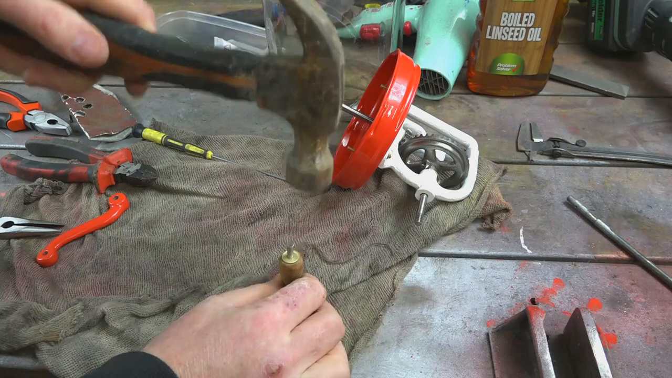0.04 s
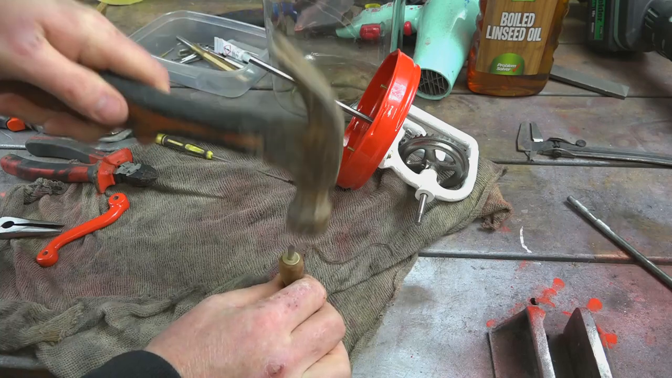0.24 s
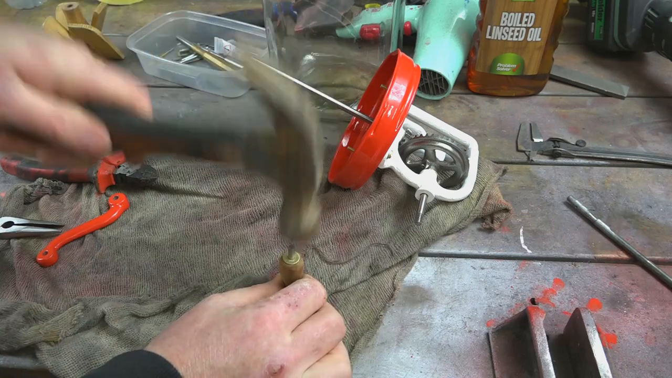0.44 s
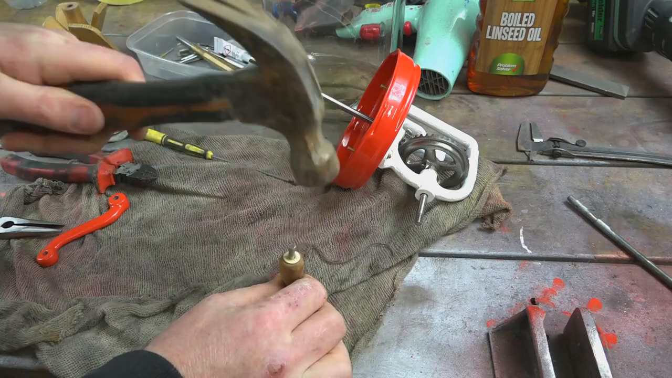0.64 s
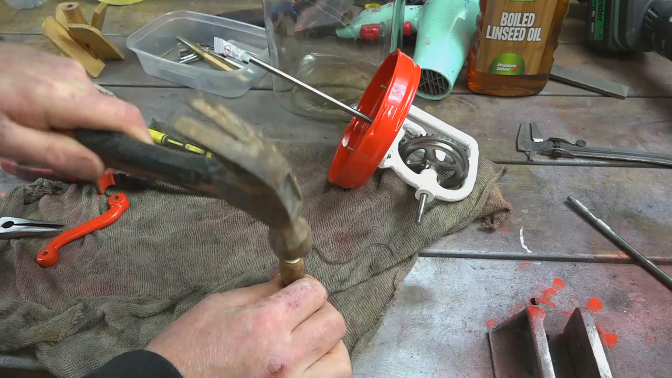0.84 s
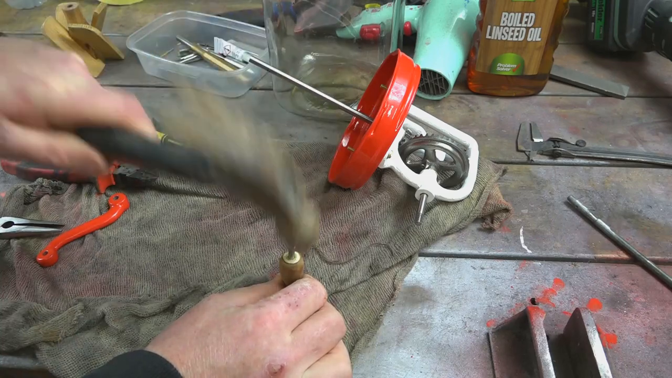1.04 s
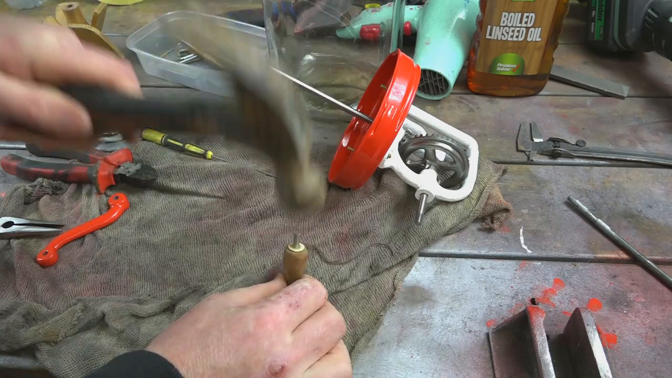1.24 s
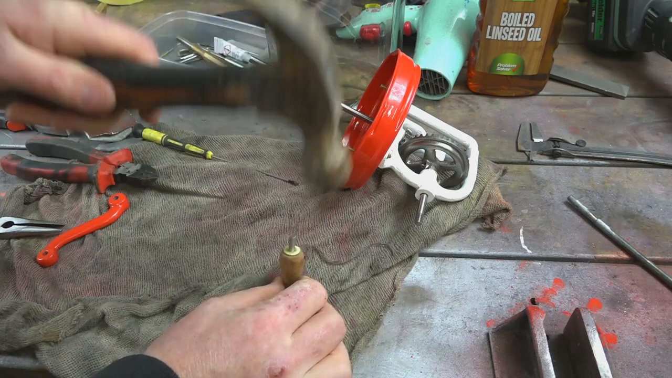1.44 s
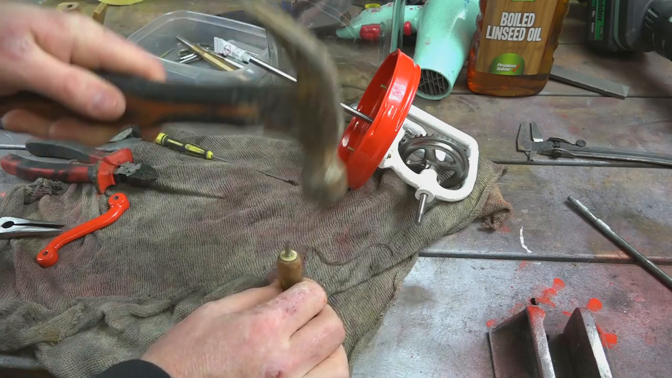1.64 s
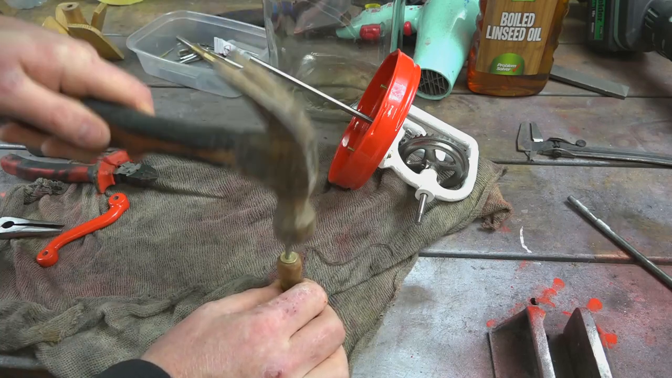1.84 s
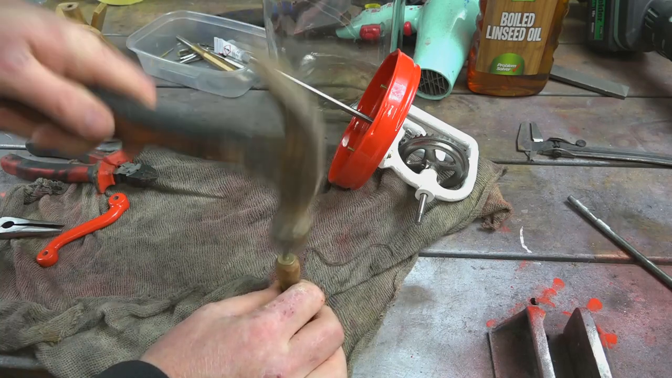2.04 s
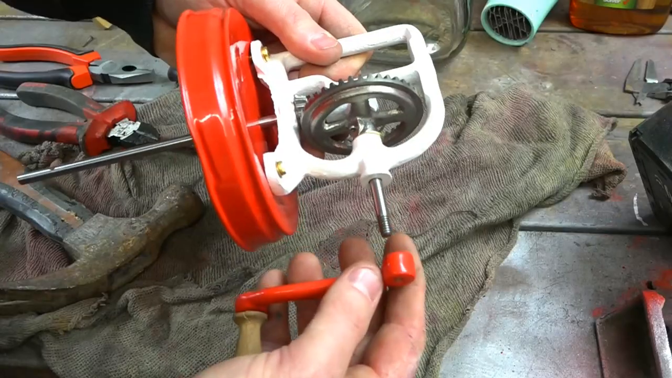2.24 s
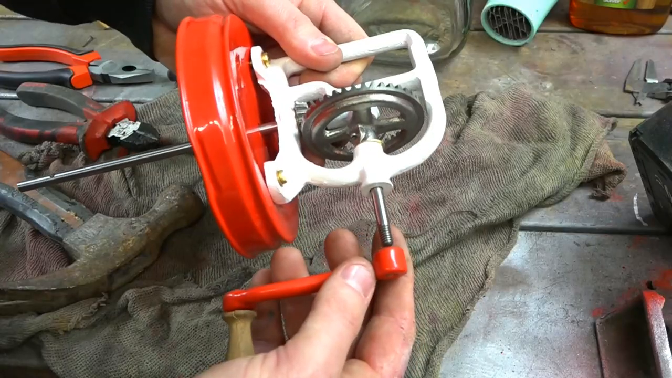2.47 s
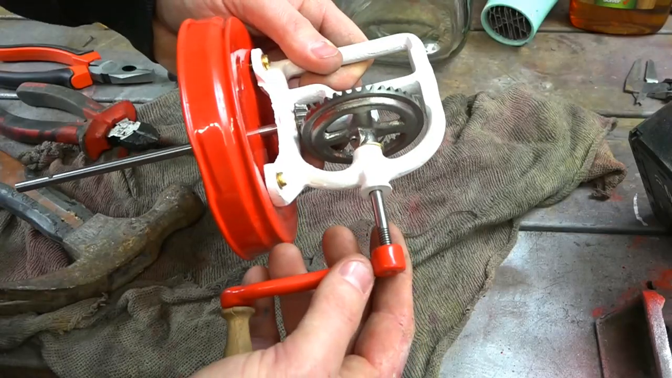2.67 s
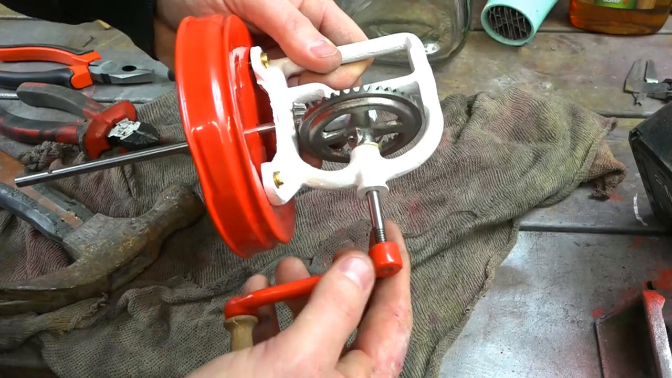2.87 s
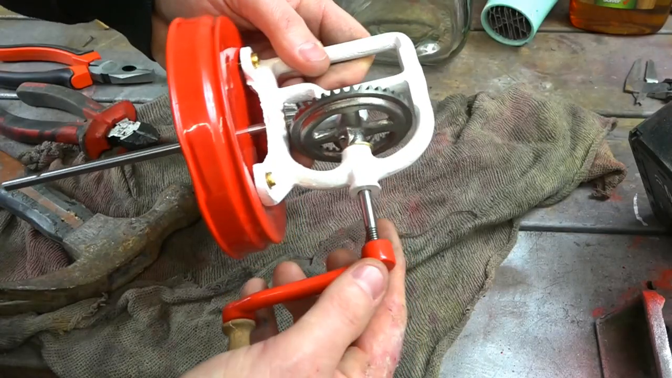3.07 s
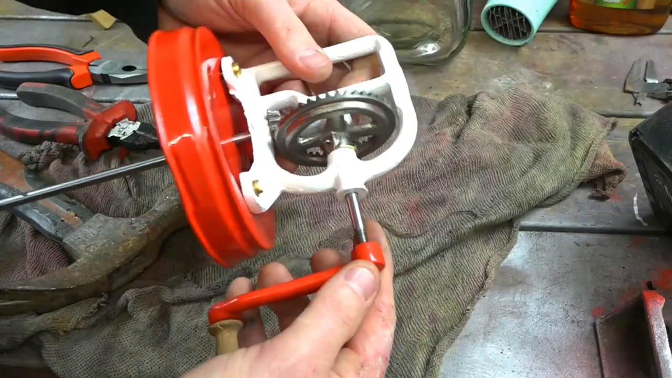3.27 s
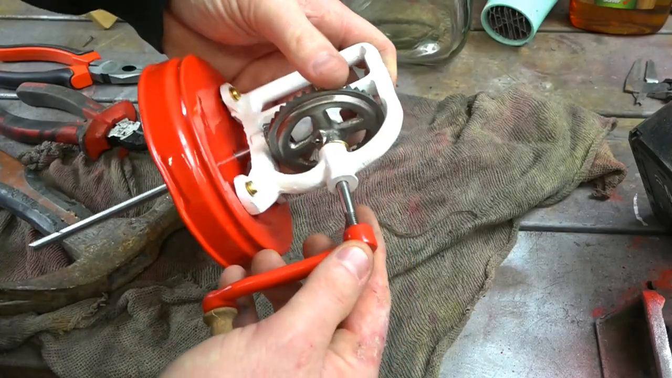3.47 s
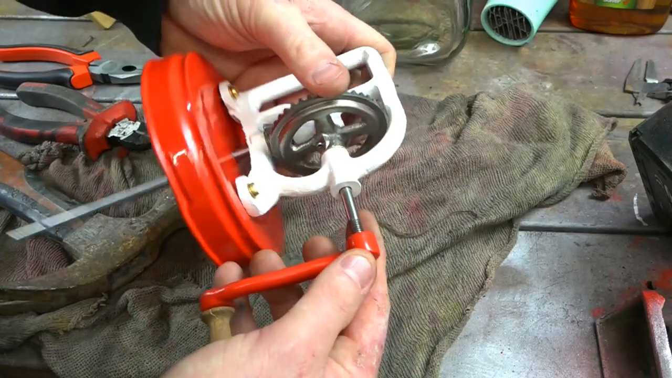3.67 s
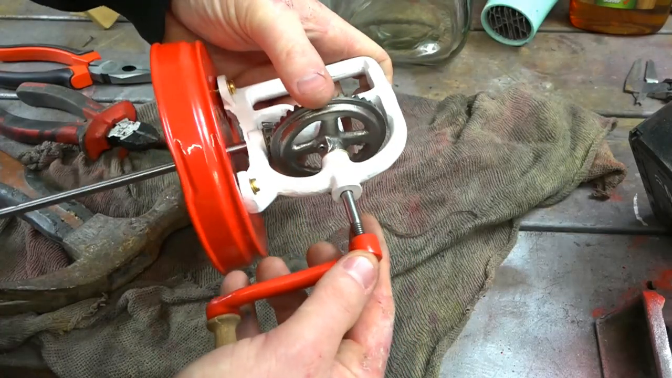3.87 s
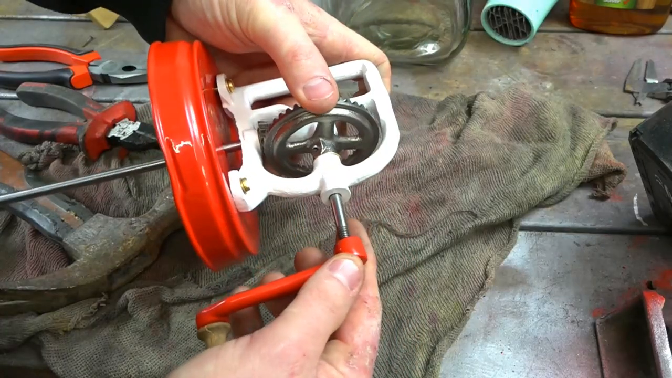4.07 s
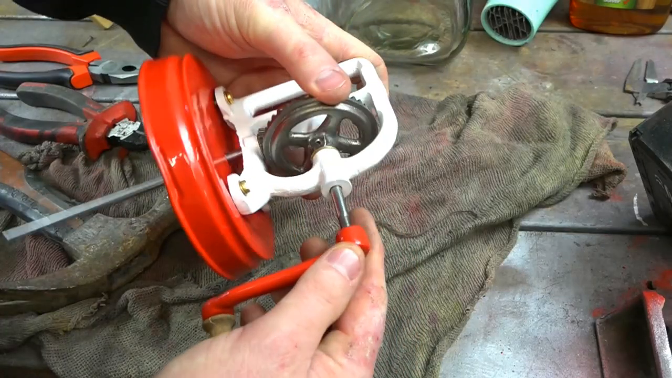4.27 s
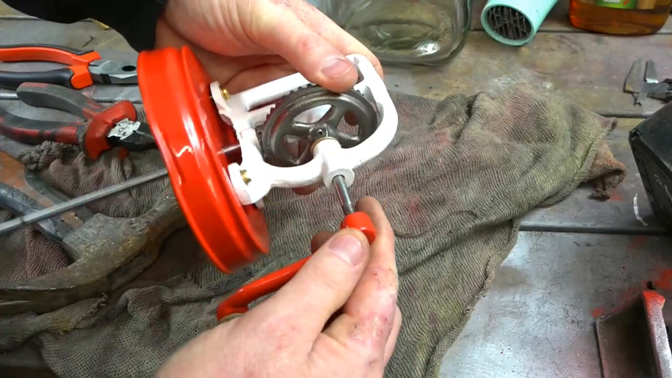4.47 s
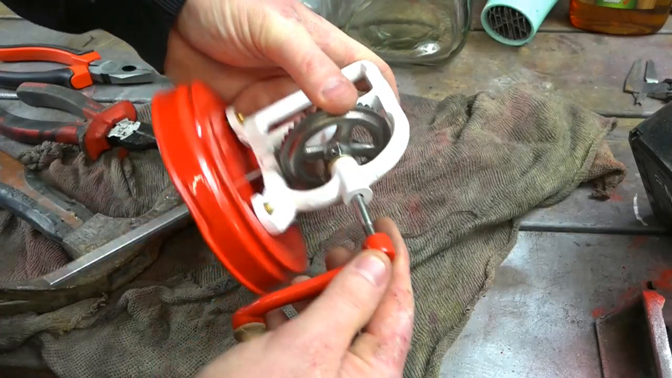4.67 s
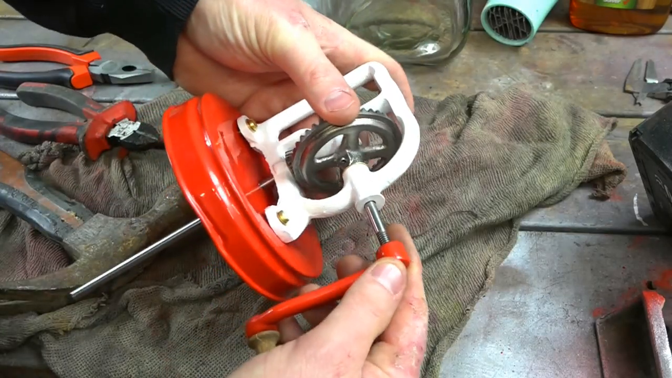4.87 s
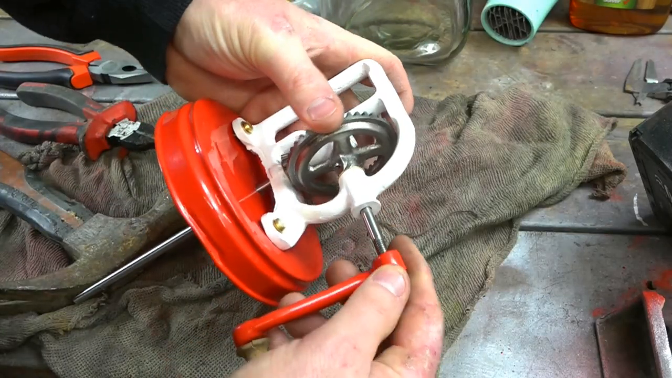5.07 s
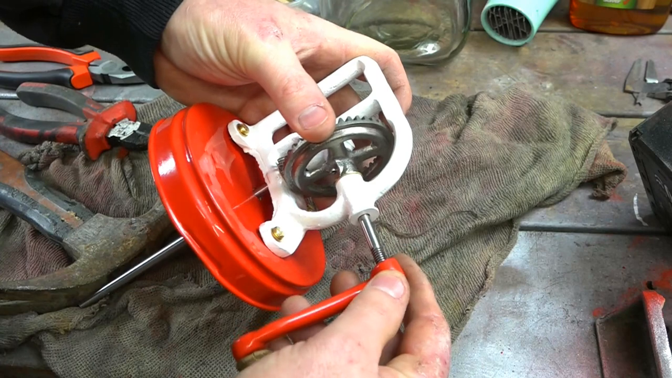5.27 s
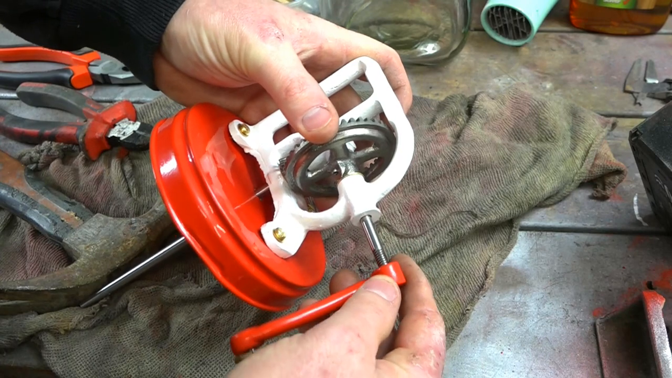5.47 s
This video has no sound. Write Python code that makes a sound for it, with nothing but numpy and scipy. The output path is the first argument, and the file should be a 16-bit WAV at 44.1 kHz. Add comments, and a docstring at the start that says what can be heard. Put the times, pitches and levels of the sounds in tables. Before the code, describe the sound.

Seven hard hammer blows ring and clatter on a workshop bench, then an abrupt cut to quiet metallic ticks and clacks of a crank being fitted.

```python
"""Hammering on a bench, then fitting a crank

A hammer drives a pin into a wooden handle on a cloth-covered steel bench: noise cracks, decaying modes of pin
and bench, clatter of resonant noise, echoes of dying noise. A steady hiss with a rumble stops early on.
After a cut, hands fit a crank to a geared frame with a tin lid: ringing modes and grit noise make the ticks
and clacks, grainy noise the scrapes, over quiet room tone."""
import sys
import numpy as np
from scipy import signal
from scipy.fft import rfft, irfft
from scipy.io import wavfile
from scipy.ndimage import uniform_filter1d, minimum_filter1d

SR = 44100
rng = np.random.default_rng(int(sys.argv[2]) if len(sys.argv) > 2 else 0)


def wav_out(sig):
    """Save sig, one row per channel (or a flat mono array), as 16-bit PCM at SR to the path in sys.argv[1]."""
    wavfile.write(sys.argv[1], SR, np.round(np.clip(np.atleast_2d(sig).T, -1, 1) * 32767).astype(np.int16))


N = 242991

# spectra below are relative: their overall level is normalised
# room tone spectrum: freq_hz, density_db_per_hz
TONE_SPECTRUM = [(15, -55), (25, 12), (87, 1), (114, -7), (145, -1.5), (249, -1.5), (489, -6.5),
                 (775, -7.5), (1260, -9.5), (2050, -13), (3160, -23.5), (7920, -23.5), (16000, -34.5)]
# hiss spectrum: freq_hz, density_db_per_hz
HISS_SPECTRUM = [(1470, -12), (2500, -9.5), (4370, -9), (4620, -10), (8020, -8.5), (14100, -7),
                 (16000, -7.5)]
# room tone, left-right correlation: freq_hz, correlation
TONE_CORRELATION = [(60, 0.85), (180, 0.9), (550, 0.85), (1650, 0.96), (4970, 0.74), (15000, -0.57)]
# echoes, left-right correlation: freq_hz, correlation
ECHO_CORRELATION = [(60, 0.92), (180, 1), (550, 0.94), (1650, 0.98), (4970, 0.87), (15000, 0.22)]
# workshop reverberation: freq_hz, t60_s
WORKSHOP_DECAY = [(80, 0.71), (210, 0.36), (560, 0.43), (1470, 0.51), (3880, 0.49), (10200, 0.35)]
# a bright scraping clatter of the hammer, then two dull knocks, ahead of blows: start_s, boom_db, clatter_db
HAMMER_SCRAPE_AND_KNOCKS = [(0.151, -43, -11.5), (0.472, -33, -28.5), (0.78, -35, -28)]
# hammer blows: start_s, boom_db, clatter_db, clatter_tilt_db_per_octave, crack_db, ping_db
HAMMER_BLOWS = [(0.222, -8, -11.5, 0, -45, -15), (0.535, -3.5, -10, 0.52, -20, -25),
                (0.843, -5, -7.5, -0.21, -41, -38), (1.136, -15, -11, -2, -32.5, -23.5),
                (1.603, -13, -14, 0.7, -32, -19), (1.864, -11, -14, 0.24, -26.5, -30),
                (2.131, -9, -15, 0.2, -26, -23)]
# bench modes: freq_hz, level_db, t60_s
BENCH_MODES = [(140, -21, .15), (170, -10, .15), (205, -11, .1), (248, -8, .1), (300, -8, .08),
               (340, -3, .1), (366, -1, .09), (395, -6, .07), (445, -11, .07), (640, -12, .07),
               (1260, -15, .08)]
# pin modes: freq_hz, level_db, t60_s
PIN_MODES = [(7730, 0, .025), (5890, -9, .012)]
# bench top and loose tools, spectrum: freq_hz, density_db_per_hz
CLATTER_SPECTRUM = [(35, -84), (60, -34), (151, -6.5), (234, 5), (364, -5.5), (491, -13), (648, -7),
                    (798, -12), (1150, -12.5), (1790, -17.5), (4730, -22), (6380, -30), (12200, -44.5),
                    (15000, -56)]
# touches of the bare shaft: start_s, crack_db
SHAFT_TOUCHES = [(2.2793, -47), (2.375, -48.5)]
# shaft modes: freq_hz, level_db, t60_s
SHAFT_MODES = [(3730, -4, .3), (3752, -4, .3), (5500, -2, .03), (9150, -5, .08)]
# contacts while fitting the crank: start_s, part_struck, level_db, rattle_s
CONTACTS = [(2.795, "crank", -57, 0.002), (3.13, "frame", -62, 0.016), (3.189, "frame", -55.5, .006),
            (3.481, "gear", -57, 0.0068), (3.4916, "crank", -49, 0.016), (3.586, "crank", -45, 0.016),
            (3.6026, "edge", -40, 0.0062), (3.6635, "lid", -29, 0.014), (3.7226, "lid", -32.5, 0.0032),
            (3.735, "edge", -51.5, 0.013), (3.7896, "crank", -52, .008), (4.2926, "frame", -32, 0.0073),
            (4.615, "gear", -51, .0044), (4.6383, "edge", -33, 0.0035), (4.771, "frame", -11.5, 0.014),
            (4.9676, "crank", -41, 0.0053), (5.123, "lid", -37, 0.025), (5.224, "crank", -48.5, 0.0065),
            (5.271, "hub", -20, 0.0061), (5.453, "edge", -54, 0.0065), (5.493, "frame", -51, 0.013)]
# shares of a contact by part_struck: crack_db, lid_db, crank_db, frame_db, gear_db, frame_tilt_db_per_octave
PART_SHARES = {"lid": (-14.5, 0.5, -8.5, -22, -38, 9), "crank": (4.5, -3, 0, -6, -30, -4),
               "frame": (4, -10.5, -9.5, -5, -11, 1.5), "gear": (-16, -6, -2, -10, 1.5, 2),
               "hub": (2, -7, -1.5, -6.5, -6.5, -11.5), "edge": (2.5, -20, -9.5, -20, -11.5, -2)}
# tin lid modes: freq_hz, level_db, t60_s
LID_MODES = [(582, -24.5, 0.083), (1282, -6.5, 0.11), (1468, -7, 0.049)]
# crank modes: freq_hz, level_db, t60_s
CRANK_MODES = [(1545, 0, .05), (1615, 0, .05), (1906, -8, .05), (2020, -11, .05)]
# frame modes: freq_hz, level_db, t60_s
FRAME_MODES = [(2143, -5, .04), (2422, -3, .04), (2760, -2, .05), (3050, -2, .04), (3410, -4, .035),
               (3980, -2, .04), (4220, 0, .05), (4370, -3, .04), (4600, -3, .04), (4850, -4, .03)]
# gear modes: freq_hz, level_db, t60_s
GEAR_MODES = [(5400, -3, .02), (6385, -3, .025), (7014, -4, .02), (7900, -4, .02), (8506, -4, .02),
              (9215, 1, .03), (10300, -6, .015)]
# dry crack of a contact, spectrum: freq_hz, density_db_per_hz
GRIT_SPECTRUM = [(88, -55.5), (150, -24.5), (894, -24), (1270, -16.5), (3350, -11.5), (4310, -10.5),
                 (5330, -17), (9180, -18), (15500, -51.5)]
# hands move to the right: time_s, left_minus_right_db
HAND_DRIFT = [(4.2, -0.9), (5.3, -1.5)]
# crank slides on its shaft: start_s, rise_s, hold_s, level_db
SLIDES = [(3.092, 0.014, 0.1, -61.5), (4.266, 0.021, .12, -51.5), (4.543, 0.0034, 0.091, -46),
          (4.72, 0.027, .01, -52.5)]
# sliding contact spectrum: freq_hz, density_db_per_hz
RUB_SPECTRUM = [(530, -29), (900, -78), (989, -51), (1100, -23), (1850, 7), (2280, -32), (3100, -6.5),
                (5450, -8), (15000, -28)]

FLAT, MONO = [(60, 0), (16000, 0)], [(1000, 1)]  # freq_hz, density_db_per_hz; freq_hz, correlation
CUT_S, CUT_FADE_S = 2.19, 0.0014  # hammering ends abruptly
TONE_HAMMERING_DB, TONE_FITTING_DB = -58, -54  # before and after the cut
HISS_DB, HISS_STOP_S, HISS_FALL_DB_PER_S = -47, 0.89, 161
RUMBLE_RE_HISS_DB = -7
HAMMERING_LOW_HZ, CRACK_TOP_HZ = 102, 9300  # hammering thins out below; crack dulls above
LEAD_RE_BOOM_DB, LEAD_S = -24, .009  # thud ahead of the boom
MODE_SCATTER_DB = 2  # standard deviation between contacts
SHAFT_RING_RE_CRACK_DB = -5.5
SLIDE_FALL_S, SLIDE_ENDS_RE_LEVEL_DB = 0.073, -21
MIC_LOW_HZ, TOP_HZ, LEFT_LAG_S, LIMIT_DB = 32.6, 16100, .000016, -6.0


def amp(db):
    """Amplitude factor of a level in dB."""
    return 10 ** (np.asarray(db) / 20)


def unit(x):
    """Signal scaled to rms 1."""
    return x / np.sqrt(np.mean(x ** 2) + 1e-20)


def along(points, hz):
    """Interpolates (freq_hz, value) points on a log frequency axis."""
    f, v = np.transpose(points)
    return np.interp(np.log(hz + 1), np.log(f + 1), v)


def level(rows):
    """Gain per sample from (time_s, level_db) rows, inaudible outside them."""
    s, db = np.transpose(rows)
    return amp(np.interp(np.arange(N) / SR, s, db, left=-200, right=-200))


def add(track, start_s, sound):
    """Mixes a sound into the track, cut at the track's end."""
    part = track[..., round(start_s * SR):][..., :sound.shape[-1]]
    part += sound[..., :part.shape[-1]]


def band(x, hz, kind="low"):
    """Second-order Butterworth filter."""
    return signal.sosfilt(signal.butter(2, hz, kind, fs=SR, output="sos"), x)


def noise(length, spectrum, correlation, t60=None):
    """Stereo coloured noise, rms 1 at its start; with t60 each frequency decays at its own rate."""
    hz, t, z = signal.stft(rng.standard_normal((2, length)), SR, nperseg=512)
    turn = np.arccos(np.clip(along(correlation, hz), 0, 1)) / 2  # mid-side balance sets the correlation
    gain = amp(along(spectrum, hz))
    gain = gain / np.sqrt(np.mean(gain ** 2))
    z = z * (gain * [np.cos(turn), np.sin(turn)])[..., None]
    if t60:
        z = z * amp(-60 * t / along(t60, hz)[:, None])
    mid, side = signal.istft(z, SR, nperseg=512)[1][:, :length]
    return np.array([mid + side, mid - side])


def ring(modes, rattle_s, spread_db, rise_s):
    """Decaying modes of random strength, excited by an impact and a noise burst; peak short-term rms 1."""
    t = np.arange(SR // 2) / SR
    tone = np.zeros(len(t))
    for hz, db, t60_s in modes:
        decay = amp(db + spread_db * rng.standard_normal() - 60 * t / t60_s)
        tone += decay * np.sin(2 * np.pi * hz * t)
    burst_t = t[:len(t) // 4]
    burst = rng.standard_normal(len(burst_t)) * np.exp(-burst_t / max(rattle_s, .0003))
    burst[0] = np.linalg.norm(burst)  # first impact
    sound = signal.fftconvolve(tone * (1 - np.exp(-t / rise_s)) ** 2, burst)[:len(t)]
    return sound / np.sqrt(np.max(uniform_filter1d(sound ** 2, size=400)))


def echo(x, wet_db):
    """Dry sound plus the workshop's answer: convolution with a fresh tail of decaying noise."""
    tail = noise(SR // 2, FLAT, ECHO_CORRELATION, WORKSHOP_DECAY)
    tail = np.pad(tail, ((0, 0), (180, 0))) / np.linalg.norm(tail[0])  # 180 samples of pre-delay
    return x + amp(wet_db) * signal.fftconvolve(x[None], tail, axes=1)[:, :len(x)]


def room_tone():
    """Coloured noise, slightly unsteady, with a level step at the cut."""
    waver = amp(0.57 * unit(uniform_filter1d(rng.standard_normal(N), size=3000)))
    tone_db = np.where(np.arange(N) / SR < CUT_S, TONE_HAMMERING_DB, TONE_FITTING_DB)
    return amp(tone_db) * waver * noise(N, TONE_SPECTRUM, TONE_CORRELATION)


def hiss():
    """Steady bright noise and a rumble, fading together at a constant dB rate."""
    rumble = amp(RUMBLE_RE_HISS_DB) * noise(N, TONE_SPECTRUM, TONE_CORRELATION)
    fall_db = HISS_FALL_DB_PER_S * np.clip(np.arange(N) / SR - HISS_STOP_S, 0, None)
    return amp(HISS_DB - fall_db) * (noise(N, HISS_SPECTRUM, MONO) + rumble)


def bench_boom():
    """Bench modes rung by one impact with a short rattle."""
    return ring(BENCH_MODES, .001, spread_db=1.5, rise_s=.0015)


def clatter(rise_s, tilt_db=0):
    """Bench top and loose tools shake: decaying noise through fresh random narrow resonances."""
    t = np.arange(SR * 3 // 4) / SR
    shake = amp(0.87 * unit(uniform_filter1d(rng.standard_normal(len(t)), size=150)))
    hz = np.fft.rfftfreq(512, 1 / SR)[1:]
    stirred_db = along(CLATTER_SPECTRUM, hz) + 3 * rng.standard_normal(len(hz))
    stirred_db += tilt_db * np.log2(np.maximum(hz, 350) / 700)  # tilt is flat below 350 Hz
    shaken = noise(len(t), np.transpose([hz, stirred_db]), ECHO_CORRELATION, WORKSHOP_DECAY)
    return shaken * (1 - np.exp(-t / rise_s)) * shake


def hammer_scrape_and_knocks():
    """A bright scraping clatter, then two dull knocks: bench boom with echo, slow-rising bass-shy clatter."""
    out = np.zeros((2, N))
    for s, boom_db, clatter_db in HAMMER_SCRAPE_AND_KNOCKS:
        add(out, s, amp(boom_db) * echo(bench_boom(), wet_db=3.5))
        add(out, s, amp(clatter_db) * signal.lfilter([1, -.9], 1, clatter(rise_s=0.017)))
    return out


def pin_strike(crack_db, ping_db):
    """Differentiated noise decays as the crack; the pin's modes ping."""
    t = np.arange(SR // 2) / SR
    crack = np.diff(rng.standard_normal(len(t) + 1)) * (1 - np.exp(-t / 0.00019))
    crack = band(amp(crack_db - 60 * t / 0.14) * crack, CRACK_TOP_HZ)
    ping = amp(ping_db) * ring(PIN_MODES, 0.0028, spread_db=MODE_SCATTER_DB, rise_s=0.000094)
    return echo(ping + crack, wet_db=-10.5)


def blows():
    """Each blow: faint leading thud, pin crack and ping, bench boom, clatter."""
    out = np.zeros((2, N))
    for s, boom_db, clatter_db, tilt_db, crack_db, ping_db in HAMMER_BLOWS:
        add(out, s - LEAD_S, amp(boom_db + LEAD_RE_BOOM_DB) * bench_boom()[:450])
        add(out, s, pin_strike(crack_db, ping_db))
        add(out, s, echo(amp(boom_db) * bench_boom(), wet_db=-3.5))
        add(out, s, amp(clatter_db) * clatter(rise_s=0.0014, tilt_db=tilt_db))
    return out


def hammering():
    """All hammer sounds, thin in the deepest bass, faded fast at the cut."""
    out = band(hammer_scrape_and_knocks() + blows(), HAMMERING_LOW_HZ, "high")
    return out * np.clip((CUT_S - np.arange(N) / SR) / CUT_FADE_S, 0, 1)


def shaft_taps():
    """Bare shaft touched: decaying grit noise and ringing shaft modes."""
    out, t = np.zeros((2, N)), np.arange(SR // 2) / SR
    for s, db in SHAFT_TOUCHES:
        grit = amp(db - 60 * t / 0.051) * noise(len(t), GRIT_SPECTRUM, MONO)[0]
        tone = ring(SHAFT_MODES, 0.0075, spread_db=MODE_SCATTER_DB, rise_s=0.00087)
        add(out, s, echo(amp(db + SHAFT_RING_RE_CRACK_DB) * tone + grit, wet_db=-12))
    return out


def crank_contacts():
    """Each contact cracks and rings lid, crank, frame and gear in the shares of the part struck."""
    out, t = np.zeros((2, N)), np.arange(SR // 2) / SR
    rise_s = 0.0016
    for s, struck, db, rattle_s in CONTACTS:
        crack_db, *parts_db, tilt_db = PART_SHARES[struck]
        frame = [(hz, mode_db + tilt_db * np.log2(hz / FRAME_MODES[0][0]), t60_s)
                 for hz, mode_db, t60_s in FRAME_MODES]
        near = np.zeros(len(t))
        for part_db, modes in zip(parts_db, (LID_MODES, CRANK_MODES, frame, GEAR_MODES)):
            near += amp(part_db) * ring(modes, rattle_s, spread_db=MODE_SCATTER_DB, rise_s=rise_s)
        envelope = np.exp(-t / max(rattle_s, .001)) * (1 - np.exp(-t / rise_s)) ** 2
        near += amp(crack_db) * envelope * noise(len(t), GRIT_SPECTRUM, MONO)[0]
        pan_db = np.interp(s, *np.transpose(HAND_DRIFT))
        add(out, s, amp(db) * echo(near, wet_db=-10) * amp([[pan_db / 2], [-pan_db / 2]]))
    return out


def scrapes():
    """Crank slides on its shaft: rub noise with a random grain, under rise-hold-fall envelopes."""
    grain = amp(3.5 * unit(uniform_filter1d(rng.standard_normal(N), size=90)))
    slide = np.zeros(N)
    for s, rise_s, hold_s, db in SLIDES:
        ends_db, full_s = db + SLIDE_ENDS_RE_LEVEL_DB, s + rise_s
        release_s = full_s + hold_s
        slide += level([(s, ends_db), (full_s, db), (release_s, db), (release_s + SLIDE_FALL_S, ends_db)])
    return slide * unit(grain * noise(N, RUB_SPECTRUM, ECHO_CORRELATION))


def scene():
    """Sums all layers, hammering slightly to the right."""
    background = room_tone() + hiss()
    fitting = shaft_taps() + crank_contacts() + scrapes()
    return background + hammering() * amp([[-.2], [.2]]) + fitting


def record(dry):
    """Microphones lose deep bass, the left hears later; a fast limiter holds peaks; the top is cut off."""
    heard = band(dry, MIC_LOW_HZ, "high")
    hz = np.fft.rfftfreq(N, 1 / SR)
    heard[0] = irfft(rfft(heard[0]) * np.exp(-2j * np.pi * hz * LEFT_LAG_S), N)
    needed = np.minimum(1, amp(LIMIT_DB) / (np.abs(heard).max(axis=0) + 1e-9))
    held = heard * uniform_filter1d(minimum_filter1d(needed, size=401), size=200)
    return irfft(rfft(held) * (hz < TOP_HZ), N)


dry = scene()
out = record(dry)
wav_out(out)
```